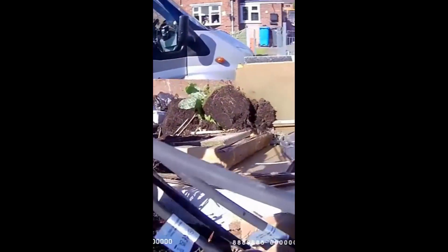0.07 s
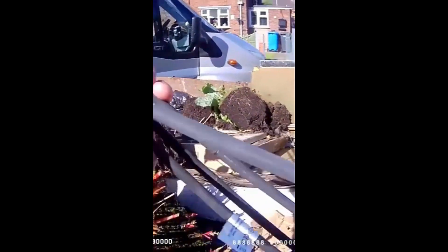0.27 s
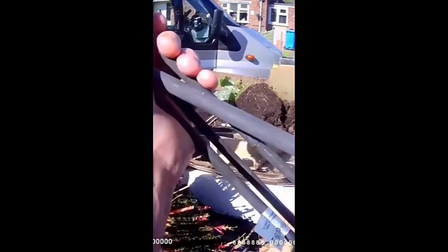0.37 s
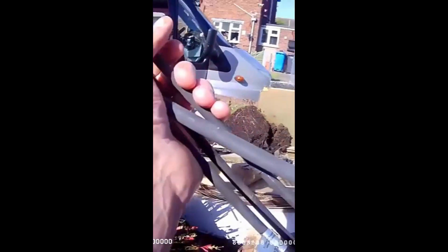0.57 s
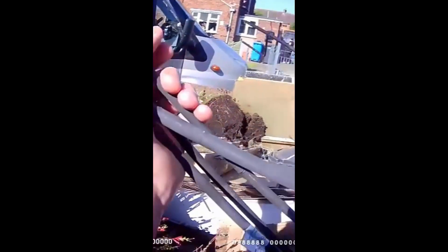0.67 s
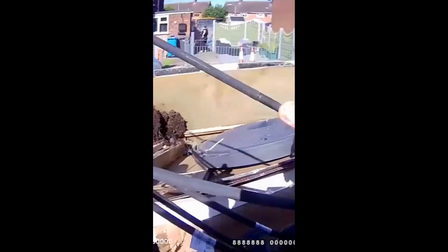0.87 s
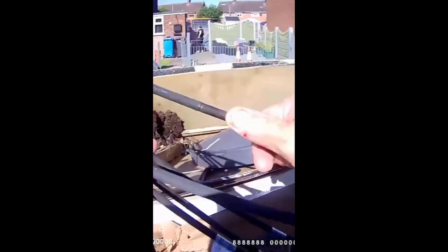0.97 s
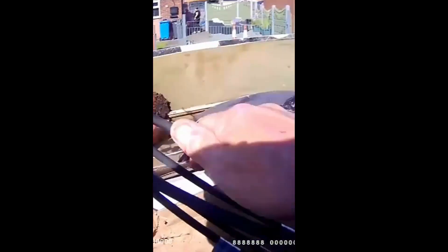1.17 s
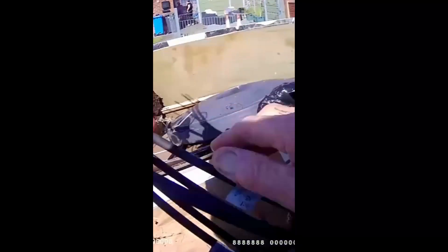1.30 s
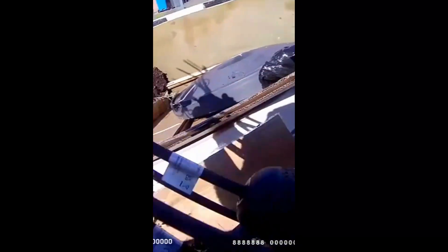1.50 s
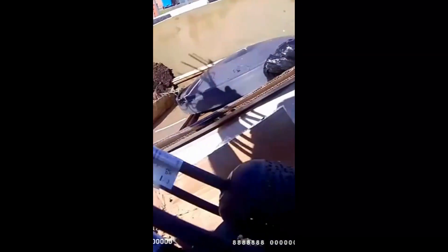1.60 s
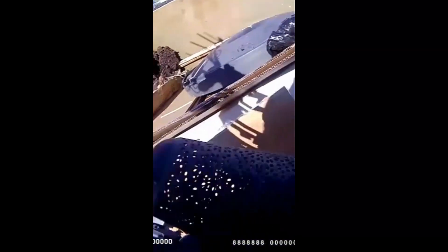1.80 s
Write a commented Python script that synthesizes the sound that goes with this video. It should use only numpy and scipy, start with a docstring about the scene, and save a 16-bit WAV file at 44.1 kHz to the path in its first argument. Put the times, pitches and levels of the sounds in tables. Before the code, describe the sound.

Scrap being handled: two hard, close thumps, followed by scraping cables and clattering metal.

```python
"""Over a low rumble and a softly idling engine, two loud knocks land by the microphone and overload it.
Thick scrap cables are being dragged over a loaded truck bed: their sheaths tick and rustle,
and loose metal scrapes, clatters and settles. Each impact excites damped modes, low in the knocked
hollow body and bright in the metal; stick-slip friction makes the scraping.
The rumble is the jostled microphone, and behind it lies the wash of a quiet street."""
import sys
import numpy as np
from scipy import signal
from scipy.fft import rfft, irfft
from scipy.io import wavfile

SR = 44100
rng = np.random.default_rng(int(sys.argv[2]) if len(sys.argv) > 2 else 0)


def transcribe(signal):
    """Save signal, clipped to [-1, 1], as a 16-bit WAV file at the path in sys.argv[1]."""
    frames = np.atleast_2d(signal).T
    limited = np.clip(frames, -1, 1)
    pcm = np.round(limited * 32767).astype(np.int16)
    wavfile.write(sys.argv[1], SR, pcm)


N = 81585

# engine harmonics (multiple of the firing rate, level/dB)
IDLE_HARMONICS = [(1, -34), (2, -51), (3, -52)]
# noise spectra of street, jostled microphone and cables (f/Hz, relative density level/dB)
STREET_SPECTRUM = [(15, 6), (40, 3), (90, -15), (160, -17), (290, -7), (500, -15), (1000, -20.5),
                   (1300, -16), (1700, -24.5), (2800, -22.5), (4500, -32), (10500, -38.5)]
RUMBLE_SPECTRUM = [(15, 12), (42, 2), (70, 4), (115, -5.5), (200, -10), (400, -18.5), (1000, -36),
                   (4000, -50)]
TICK_SPECTRUM = [(1000, -38), (3000, -1.5), (4800, 1), (6800, -9), (9000, 1.5), (11000, 4)]
RUSTLE_SPECTRUM = [(500, -25), (2000, 11.5), (4000, 1.5), (10000, -1)]
SCRAPE_SPECTRUM = [(150, -8.5), (400, 1), (850, 2), (1600, -5), (2600, -3.5), (5500, -11), (7000, -17.5),
                   (11000, -33)]
# envelope of the handling rumble (t/s, level/dB)
RUMBLE_ENVELOPE = [(0, -38), (.1, -33), (0.161, -29), (.3, -30), (.37, -28), (0.422, -30), (.55, -24),
                   (.63, -25.5), (.7, -36.5), (1.0, -38), (1.22, -38), (1.301, -27), (1.379, -37.5),
                   (1.69, -36), (1.75, -26.5), (1.79, -42), (1.85, -28)]
# sheath striking sheath (t/s, level/dB)
SHEATH_TICKS = [(0.7, -30.5), (0.7401, -38), (0.7523, -25.5), (0.757, -27.5), (0.831, -35), (0.8395, -26.5),
                (0.932, -24), (1.434, -29), (1.456, -33)]
# cable sliding over scrap (t/s, rise/s, fall/s, level/dB)
CABLE_SLIDES = [(0.31, 0.0062, 0.027, -39), (0.9, 0.01, 0.13, -29), (0.949, 0.0055, 0.079, -41.5),
                (1.386, 0.016, 0.061, -27), (1.427, 0.0074, 0.052, -39.5)]
# metal pieces striking the pile (t/s, rise/s, gain/dB at 700 Hz, 3 kHz, 9 kHz, ping f/Hz, ping level/dB)
METAL_IMPACTS = [(1.0328, 0.0013, -15, -10, -7.5, 541, -17.5), (1.037, 0.00079, -12, -25, -38, 5500, -12),
                 (1.047, 0.006, -16.5, -12, -14, 5150, -15), (1.0623, 0.00062, -16, -21, -14.5, 5624, -10),
                 (1.074, 0.003, -16, -19, -16, 1922, -15), (1.0832, 0.00097, -14, -8, -12.5, 8370, -7),
                 (1.088, 0.0012, -14.5, -49, -31, 1930, -11), (1.097, 0.0018, -20, -24, -27, 3950, -17.5),
                 (1.118, .003, -15.5, -34, -38, 5740, -25), (1.149, 0.0026, -22, -22, -33, 2710, -24),
                 (1.1661, 0.0015, -21.5, -17.5, -15, 7260, -20), (1.174, 0.0023, -23, -26, -28, 2040, -15),
                 (1.187, .002, -17.5, -26, -58, 3520, -26.5),
                 (1.2246, 0.0014, -19.5, -25.5, -35, 6750, -29), (1.2495, 0.0038, -30, -24, -42, 2840, -30),
                 (1.286, 0.009, -19.5, -30, -34.5, 2090, -25),
                 (1.3166, 0.00083, -18.5, -22.5, -24.5, 7300, -22),
                 (1.336, .001, -15.5, -23.5, -62, 3290, -24), (1.34, 0.0016, -24, -46, -56, 880, -23),
                 (1.394, .001, -53, -41, -59, 855, -24), (1.406, 0.0012, -23, -44, -40, 720, -32),
                 (1.724, 0.00067, -18, -42.5, -56, 1130, -30.5), (1.746, 0.0017, -28, -48.5, -48, 798, -34)]
# spectrum of a metal contact (f/Hz, relative density level/dB)
CLASH_SPECTRUM = [(100, -14), (380, -11), (570, -2), (1300, -6), (3300, -2), (5600, -1), (6200, -6),
                  (8000, -5), (9100, -13.5), (10600, -7.5)]
# decay time of its tail (f/Hz, T60/s)
CLASH_TAIL_DECAY = [(400, 0.24), (1100, 0.4), (3000, 0.21), (9000, 0.042)]
# broad resonances of the loose pieces (f/Hz, width/Hz, gain/dB)
PIECE_RESONANCES = [(2097, 59, 9.5), (3530, 530, 2), (3770, 100, -18), (5500, 160, 0.5), (6000, 240, 2),
                    (8480, 99, 13.5), (9600, 150, 13), (10975, 140, 19)]
# modes of the metal pile (f/Hz, relative level/dB, T60/s)
PILE_MODES = [(540, -12, .25), (800, -15, .2), (1098, -10, .28), (1695, -6, .33), (1835, -7, .33),
              (1990, -6, .28), (2692, -6, .28), (2918, -6, .28), (3283, -7, .25), (3420, -8, .26),
              (4280, -11, .16), (4809, -8, .16), (5216, -5, .15), (5526, -8, .14), (5615, -8, .14),
              (5680, -8, .14), (9965, -11, .15)]
# knocks and rebounds (t/s, thump gain/dB, crack gain/dB, pitch factor, decay time factor)
BODY_IMPACTS = [(0.2313, 5.5, 5, 1.011, 1.055), (0.2524, -17.5, -14, 0.93, 1.2),
                (0.265, -7, -20.5, 0.91, 0.89), (0.4708, 2, 3, 1.024, 1.03),
                (0.491, -17.5, -6.5, 1.18, 0.39), (0.4935, -24, -22.5, 1.0, 1.4),
                (0.5054, -6.5, -37, 1.013, 0.71), (1.7232, -23.5, -42, 0.94, 1.2),
                (1.735, -31, -29, 0.4, 0.65), (1.747, -33.5, -36.5, 0.48, 1.1)]
# modes of the hollow body, before each knock scales them (f/Hz, level/dB, T60/s)
BODY_MODES = [(125.6, -21, 0.23), (179.2, -30, 0.59), (201, -5, 0.15), (309.8, -9, 0.072),
              (348, -5.5, 0.079), (398.4, -8, 0.086), (457, -25.5, 0.14), (733, -15, 0.034),
              (1019.4, -19.5, 0.1), (1185, -3.5, 0.028), (1970, -15.5, 0.042), (2170, -25.5, 0.038),
              (2870, -13.5, 0.023)]
# spectrum of a knock's crack (f/Hz, relative density level/dB)
CRACK_SPECTRUM = [(60, -41), (150, -2), (400, -0.5), (800, -6), (1500, -3.5), (3000, -0.5), (4500, -8),
                  (7000, -18), (11000, -22)]

TIME = np.arange(N) / SR
RING_TIME = np.arange(SR // 2) / SR  # time since a contact


def undb(db):
    """Amplitude ratio of a level."""
    return 10 ** (np.asarray(db) / 20)


def at(hz, points):
    """Interpolation of (f/Hz, value) points on a log-frequency axis."""
    f, values = np.array(points, float).T
    return np.interp(np.log(np.maximum(hz, 1)), np.log(f), values)


def noise(spectrum, size):
    """Spectral shaping of white noise, scaled to unit rms."""
    gain = undb(at(np.fft.rfftfreq(size, 1 / SR), spectrum))
    x = irfft(rfft(rng.standard_normal(size)) * gain, size)
    return x / x.std()


def decay(t60):
    """Exponential damping by 60 dB in t60 seconds."""
    return np.exp(-np.log(1000) * RING_TIME / t60)


def mode(hz, t60):
    """Free vibration of a damped oscillator, at random phase."""
    return np.sin(2 * np.pi * (hz * RING_TIME + rng.random())) * decay(t60)


def wander(per_s):
    """Random modulation: straight lines between Gaussian values."""
    return np.interp(TIME * per_s, np.arange(N), rng.standard_normal(N))


def add(out, start, x):
    """Superposition of a sound from its start time."""
    i = int(start * SR)
    out[i:i + len(x)] += x[:N - i]


def street(firing_hz=27.67, wash_db=-38):
    """Periodic firing gives an idling engine its harmonics and modulates the wash of the street."""
    phase = 2 * np.pi * np.cumsum(firing_hz * (1 + 0.0223 * wander(5.09))) / SR
    idle = sum(np.sqrt(2) * undb(db) * np.sin(round(k) * phase + 2 * np.pi * rng.random())
               for k, db in IDLE_HARMONICS)
    wash = noise(STREET_SPECTRUM, N) * undb(wash_db + 0.31 * wander(7.9) + 0.99 * np.sin(phase))
    return idle + wash


def handling():
    """Structure-borne sound: jostling reaches the microphone as a low rumble."""
    level_db = np.interp(TIME, *np.array(RUMBLE_ENVELOPE).T)
    return noise(RUMBLE_SPECTRUM, N) * undb(level_db)


def ticks():
    """Brief contacts have broad spectra: sheath on sheath gives a bright tick."""
    out = np.zeros(N)
    for start, db in SHEATH_TICKS:
        add(out, start, undb(db) * noise(TICK_SPECTRUM, len(RING_TIME)) * decay(t60=0.016))
    return out


def scrapes(rustle_db=-52, grain_db=3.5):
    """Stick-slip friction: cable slides in fine grains, over a faint rustle of sheaths."""
    out = noise(RUSTLE_SPECTRUM, N) * undb(rustle_db) * np.interp(TIME, [.22, .32, .62, .9], [0, 1, 1, 0])
    for start, rise, fall, db in CABLE_SLIDES:
        envelope = np.interp(RING_TIME, [0, rise, rise + fall], [0, 1, 0]) ** 2
        add(out, start, undb(db) * noise(SCRAPE_SPECTRUM, len(RING_TIME)) * envelope)
    return out * undb(grain_db * wander(per_s=670))


def clash(tone, spacing_hz=54.25, scatter_db=4):
    """Modal overlap: the dense, uneven modes of struck metal merge into noise; treble dies first."""
    size = len(RING_TIME)
    f = np.fft.rfftfreq(size, 1 / SR)
    resonance_db = sum(db / (1 + (2 * (f - hz) / width) ** 2) for hz, width, db in PIECE_RESONANCES)
    uneven = undb(scatter_db * np.interp(f / spacing_hz, np.arange(len(f)), rng.standard_normal(len(f))))
    uneven /= np.sqrt(np.mean(uneven ** 2))
    spectrum = rfft(noise(CLASH_SPECTRUM, size)) * undb(at(f, tone) + resonance_db) * uneven
    strike = undb(-4) * decay(t60=0.026) + decay(t60=0.068)
    edges_hz = np.geomspace(40, 16000, 14)
    out = np.zeros(size)
    for lo, hi in zip(edges_hz, edges_hz[1:]):
        band = irfft(spectrum * ((f >= lo) & (f < hi)), size)
        tail = undb(-7) * decay(at(np.sqrt(lo * hi), CLASH_TAIL_DECAY))
        out += band * (strike + tail)
    return out


def clatter(pile_db=-13, scatter_db=2, detune=0.00091, ping_t60=.055, ping_spread=.006):
    """Impact excitation: each piece clashes, rings the pile and pings on close, beating modes."""
    out = np.zeros(N)
    for start, rise, low_db, mid_db, high_db, ping_hz, ping_db in METAL_IMPACTS:
        tone = [(700, low_db), (3000, mid_db), (9000, high_db)]
        pile = np.zeros(len(RING_TIME))
        for hz, db, t60 in PILE_MODES:
            gain = undb(pile_db + db + at(hz, tone) + scatter_db * rng.standard_normal())
            pile += gain * mode(hz * (1 + detune * rng.standard_normal()), t60)
        ping = mode(ping_hz, ping_t60)
        for _ in range(2):
            ping += .5 * mode(ping_hz * (1 + ping_spread * rng.standard_normal()), ping_t60)
        attack = np.minimum(RING_TIME / rise, 1)
        add(out, start, (clash(tone) + pile + undb(ping_db) * ping) * attack)
    return out


def knocks(sharpening=0.079, sag_s=0.013):
    """Nonlinear vibration: a hard blow cracks, and the hollow body starts sharp and sags to pitch."""
    out = np.zeros(N)
    sagging_time = RING_TIME + sharpening * sag_s * (1 - np.exp(-RING_TIME / sag_s))
    for start, thump_db, crack_db, pitch, ring in BODY_IMPACTS:
        tone = [(336, thump_db), (1300, crack_db)]  # low modes follow the thump, high ones the crack
        body = sum(undb(db + at(hz, tone)) * np.sin(2 * np.pi * hz * pitch * sagging_time)
                   * decay(ring * t60) for hz, db, t60 in BODY_MODES)
        envelope = decay(t60=ring * 0.025) + undb(-31.5) * decay(t60=.22)
        crack = noise(CRACK_SPECTRUM, len(RING_TIME)) * envelope
        add(out, start, body + undb(crack_db) * crack)
    return out


def scene():
    """Superposition of all sources at one microphone, the same in both channels."""
    return np.tile(knocks() + clatter() + scrapes() + ticks() + handling() + street(), (2, 1))


def record(dry, overload=.86, knee=4, ceiling=.9, top_hz=10900):
    """Saturation: the microphone flattens the loudest peaks; the recorder caps them and cuts the top."""
    low_pass = signal.firwin(161, top_hz, window=("kaiser", 8), fs=SR)
    cut_top = lambda x: signal.fftconvolve(x, low_pass[None], mode="same", axes=1)
    rounded = dry / (1 + np.abs(dry / overload) ** knee) ** (1 / knee)
    return cut_top(np.clip(cut_top(rounded), -ceiling, ceiling))


dry = scene()
out = record(dry)
transcribe(out)
```